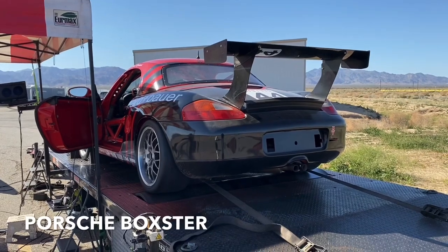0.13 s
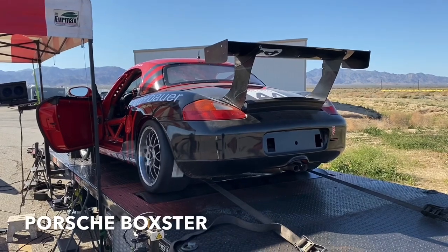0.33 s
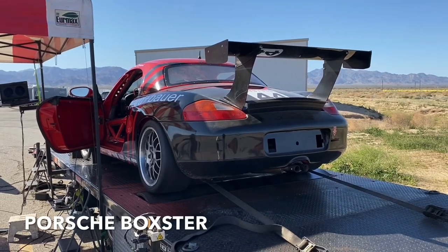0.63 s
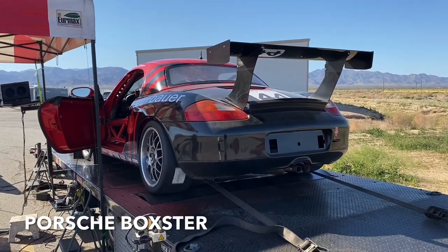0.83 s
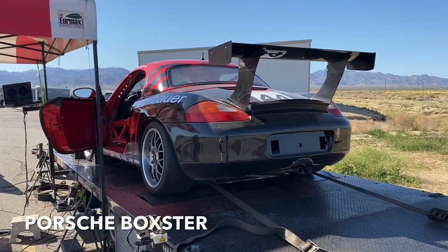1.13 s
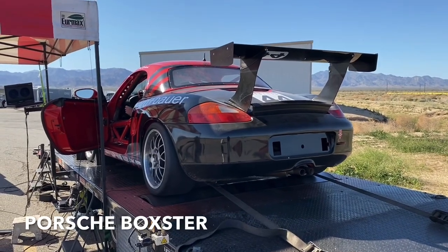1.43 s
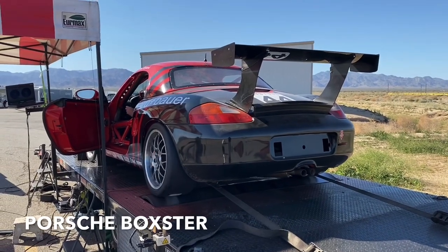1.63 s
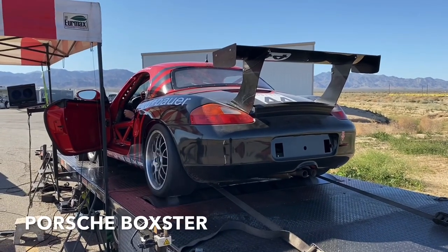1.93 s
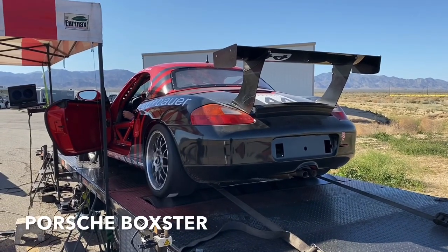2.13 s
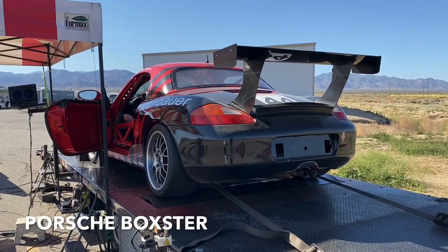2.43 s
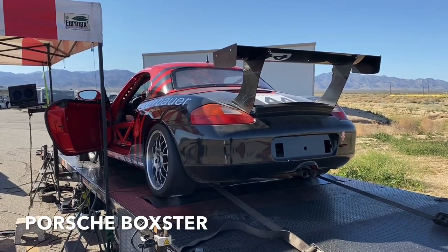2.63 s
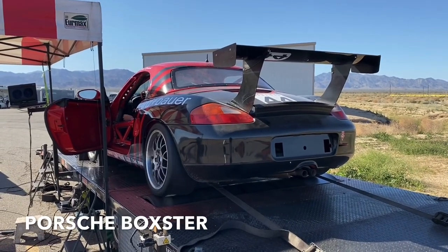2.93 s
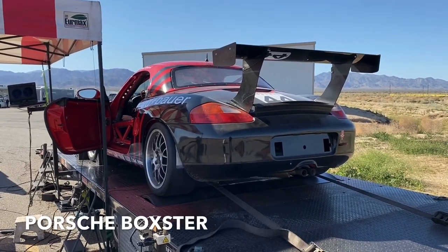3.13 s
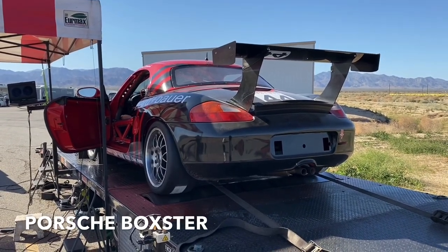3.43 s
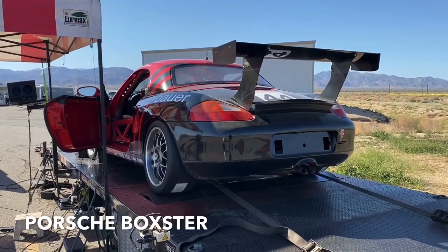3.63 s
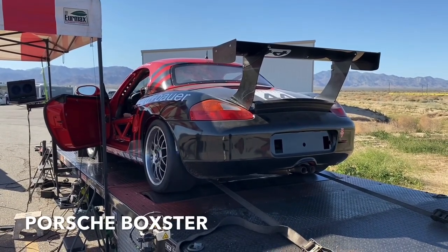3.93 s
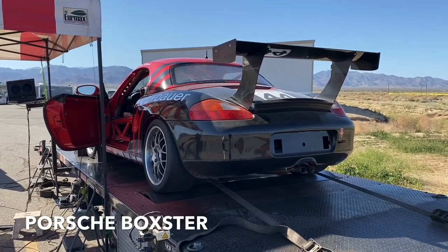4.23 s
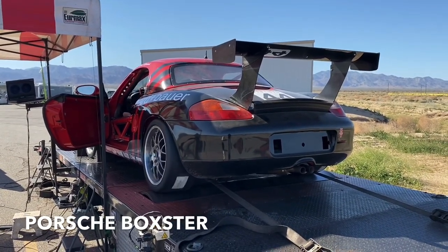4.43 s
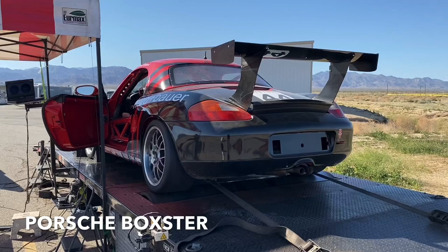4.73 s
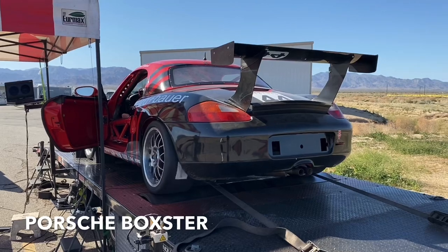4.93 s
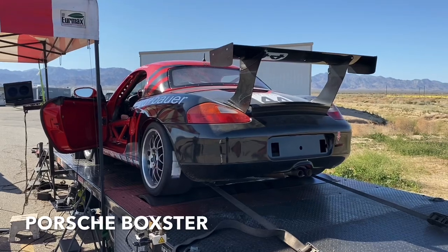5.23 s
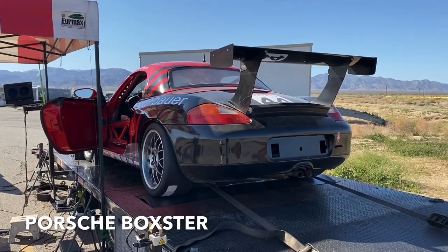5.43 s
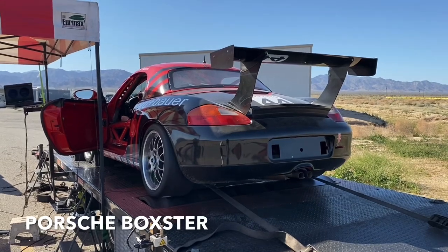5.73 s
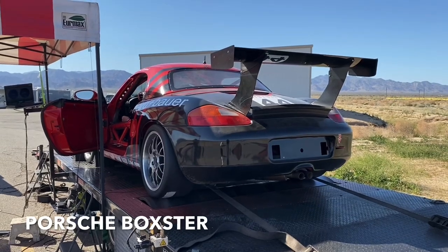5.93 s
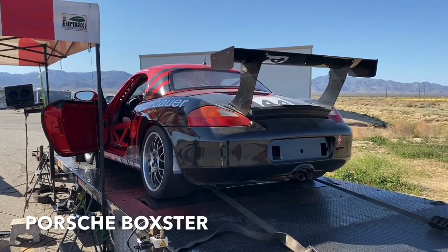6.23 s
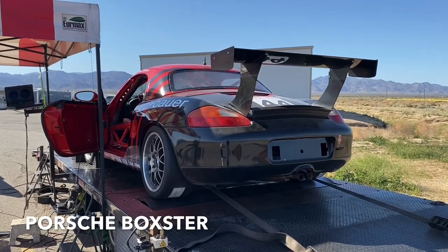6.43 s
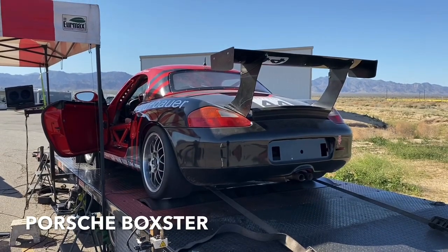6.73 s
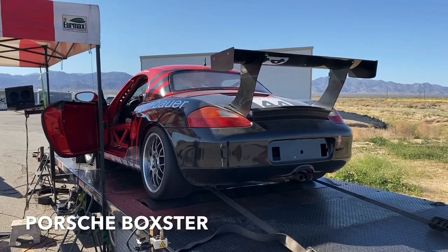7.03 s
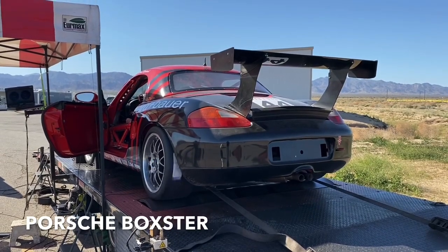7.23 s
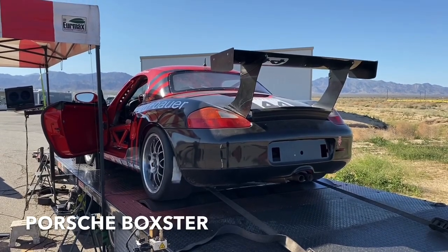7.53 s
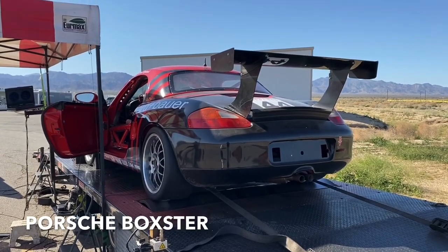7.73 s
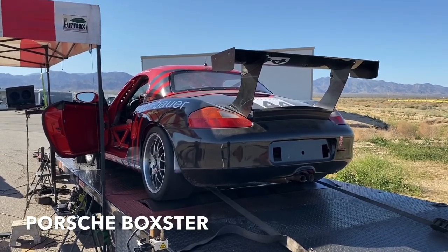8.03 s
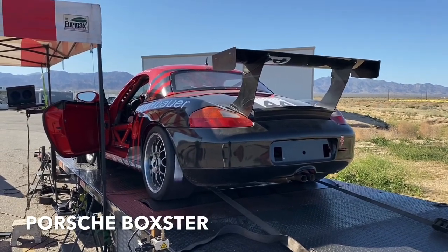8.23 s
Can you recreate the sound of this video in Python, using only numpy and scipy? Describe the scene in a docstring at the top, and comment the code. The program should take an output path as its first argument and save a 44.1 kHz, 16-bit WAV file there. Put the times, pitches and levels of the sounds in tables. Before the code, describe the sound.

A quick rev jumps up in pitch, then falls slowly as tyres whirr and roar on steel rollers. An air valve spits briefly midway through the descent. After a low point the engine kicks in abruptly, lurches, and pulls harder and higher with uneven growl, crackling exhaust and rising tyre whine. Outdoors behind the car, stereo, little reverberation, faint hum and low wind thumps.

```python
"""A six-cylinder race car on an outdoor chassis dynamometer, heard from behind: a blip, a coast down, a full-throttle pull.
The engine sums firing-rate harmonics and slower beats with a throb, bark, crack and hiss at the firings, over a rumble.
The tyres sing on the rollers: tread-rate lines and a thin whine over a coloured noise roar.
Compressed air puffs as a fading noise burst; a sine hum runs throughout and low wind thumps come late, as decaying sines."""
import sys
import numpy as np
from scipy import signal
from scipy.fft import rfft, irfft, next_fast_len
from scipy.io import wavfile
from scipy.ndimage import uniform_filter1d

SR = 44100
rng = np.random.default_rng(int(sys.argv[2]) if len(sys.argv) > 2 else 0)


def generate_wav(sig):
    """Save sig (samples, or channels by samples) to the path in sys.argv[1] as 16-bit PCM at SR."""
    pcm = np.round(np.clip(np.atleast_2d(sig).T, -1, 1) * 32767).astype(np.int16)
    wavfile.write(sys.argv[1], SR, pcm)


N = 369116

# engine speed before the driveline kick: (t/s, firing rate/Hz)
SPEED = [(0, 97.3), (.09, 105.2), (.14, 125.2), (.23, 172.5), (.3, 167.6), (1, 163.9), (2.25, 156),
         (2.4, 153.4), (2.6, 148.8), (3.2, 131.1), (3.6, 118), (3.9, 109.3), (4.2, 100.3), (4.36, 96.4),
         (4.6, 96.8), (4.8, 99.7), (5.1, 106.1), (5.6, 117.6), (6.6, 141.1), (7.2, 155.4), (8.37, 184.6)]
# one row a cylinder in firing order, before scaling: (strength/dB, lateness/share of the firing gap)
CYLINDERS = [(10, 0.041), (-0.5, -0.035), (8, 0.035), (7.5, -0.023), (3.5, 0.051), (3, -0.068)]
OPENS_S, OPENING_S = 4.2, 0.063  # the throttle goes to full load


def gain_of(db):
    """Turns decibels into an amplitude factor."""
    return 10 ** (np.asarray(db) / 20)


def evened(x):
    """Scales x to rms 1."""
    return x / np.sqrt(np.mean(x ** 2) + 1e-20)


def read(points, hz):
    """Reads a table of values against frequency on a logarithmic axis."""
    f, value = np.transpose(points)
    return np.interp(np.log(hz + 1), np.log(f + 1), value)


def curves(rows):
    """Draws each column of a timed table as a line over the whole scene."""
    s, *columns = np.transpose(rows)
    return [np.interp(np.arange(N) / SR, s, c) for c in columns]


def coloured(x, spectrum):
    """Passes x through a causal minimum-phase filter of energy 1 with the given spectrum."""
    log_gain = read(spectrum, abs(np.fft.fftfreq(8192, 1 / SR))) * np.log(10) / 20
    response = np.exp(np.conj(signal.hilbert(log_gain)))
    taps = np.fft.ifft(response).real[:4096]
    return signal.oaconvolve(x, taps / np.linalg.norm(taps))[:N]


def drift(per_s):
    """Slow chance of rms 1: noise smoothed twice over 1 / per_s seconds."""
    span = max(int(SR / per_s), 2)
    smooth = uniform_filter1d(rng.standard_normal(N), span)
    return evened(uniform_filter1d(smooth, span))


def clicks(at, size):
    """Band-limited clicks at exact places between samples, as windowed sincs."""
    index = np.floor(at).astype(int)[:, None] + np.arange(-7, 9)
    off = index - at[:, None]
    out = np.zeros(N + 40000)
    shape = np.sinc(off) * np.cos(np.pi * off / 18) ** 2
    np.add.at(out, np.clip(index, 0, None), size[:, None] * shape)
    return out[:N]


def throttle():
    """0 when shut, 1 when wide open, and the seconds since it began to open."""
    since = np.maximum(np.arange(N) / SR - OPENS_S, 0)
    return np.minimum(since / OPENING_S, 1), since


def blend(shut, wide):
    """Moves from the throttle-shut value to the wide-open one as the throttle opens."""
    return shut + throttle()[0] * (wide - shut)


def firing_rate():
    """Firings per second; the driveline winds up and rings out as the throttle opens."""
    kick_share, kick_lag_s, kick_decay_s, kick_hz = .085, .035, .12, 9
    wound = np.maximum(throttle()[1] - kick_lag_s, 0)
    kick = np.exp(-wound / kick_decay_s) * np.sin(2 * np.pi * kick_hz * wound)
    return curves(SPEED)[0] * (1 + kick_share * kick)


def harmonic_levels(rate, drive_db, bark_db):
    """Level of each firing-rate harmonic: drive, pipe resonances and, under load, a gain from the bark."""
    # one row a harmonic: (throttle shut/dB on the drive, open/dB on the drive, gain/dB per dB of bark)
    harmonics = [(8, 11.5, 0), (3, 5.5, 0), (-9.5, 0.24, 0), (-35, -9.5, 0), (-29, -0.5, 1.8),
                 (-27, -2, 0.5)]
    # what the pipe passes when coasting: (f/Hz, level/dB)
    pipe_shut = [(95, -13.5), (118, 4), (140, 5.5), (165, 1), (200, -1.5), (236, 6), (270, 2.5),
                 (320, -4.5), (400, -10.5), (510, -10)]
    # what the pipe passes under load: (f/Hz, level/dB)
    pipe_open = [(90, -4.5), (110, 0.7), (125, 4), (150, -2.1), (185, 4), (230, 5.3), (285, 9), (320, 4.5),
                 (360, 3.1), (430, 5.5), (470, -1), (510, -11.5), (560, -1.5), (620, -8.5), (700, -7.4),
                 (780, -4), (860, -9), (1000, -25), (1120, -10)]
    usual_bark_db = -31  # the bark at which the harmonics gain nothing
    levels = []
    for k, (shut, wide, per_db) in enumerate(harmonics, 1):
        coasting_db = shut + read(pipe_shut, k * rate)
        loaded_db = wide + read(pipe_open, k * rate) + per_db * (bark_db - usual_bark_db)
        levels.append(drive_db + blend(coasting_db, loaded_db))
    return levels


def clean_tones(turns, harmonic_db):
    """The pipe delays each harmonic differently, which spreads the pulse."""
    return sum(np.sqrt(2) * gain_of(db + .3 * drift(25)) * np.cos(2 * np.pi * k * turns + .9 * k ** 2)
               for k, db in enumerate(harmonic_db, 1))


def lope(rate, turns, drive_db):
    """One cylinder fires weakly: the beats line up against the harmonics once a cycle."""
    # beats between the harmonics, before sway: (f/sixths of the firing rate,
    # coasting slow/dB, coasting fast/dB, loaded slow/dB, loaded fast/dB)
    beats = [(2, -80, -65, -70, -59), (3, -61, -52.5, -55, -48), (4, -67, -48, -72, -62),
             (5, -53, -57, -63, -55), (7, -62, -56.5, -51, -59), (8, -51.5, -57, -39.5, -32.5),
             (9, -53, -58.5, -40.5, -37), (10, -54, -71, -62, -41), (11, -65, -83, -69, -44),
             (13, -60, -72, -68, -51), (14, -65, -62.5, -40, -36), (15, -79, -83, -33, -45),
             (16, -62, -78, -39, -49.5)]
    slow, fast = 100, 170  # firings per s
    full_drive_db, weak_slope = -32.5, 3  # below this drive, loaded beats lose dB per dB
    quickness = (rate - slow) / (fast - slow)
    weak_db = weak_slope * np.minimum(drive_db - full_drive_db, 0)
    sways = [3.0 * drift(2.3) for _ in CYLINDERS]
    out = np.zeros(N)
    for k, shut_slow, shut_fast, open_slow, open_fast in beats:
        coasting_db = shut_slow + quickness * (shut_fast - shut_slow)
        loaded_db = open_slow + quickness * (open_fast - open_slow) + weak_db
        level = gain_of(blend(coasting_db, loaded_db) + sways[round(k) % len(sways)])
        order = k / len(CYLINDERS)
        out -= np.sqrt(2) * level * np.cos(2 * np.pi * order * turns + .9 * order ** 2)
    return out


def roughness(rate):
    """Gas share of the bark, gas share of the crack, and mismatch of the two cylinder banks."""
    # under load: (firing rate/Hz, gas in the bark/0-1, gas in the crack/0-1, bank mismatch/0-1)
    rough_open = [(124, .4, .62, 1), (136, .28, .32, 1), (153, .3, .32, .8), (167, .25, .24, .2),
                  (185, .25, .22, .15)]
    # when coasting: (gas in the bark/0-1, gas in the crack/0-1, bank mismatch/0-1)
    rough_shut = (.8, .95, 1)
    speed, *shares = np.transpose(rough_open)
    return [blend(shut, np.interp(rate, speed, wide)) for shut, wide in zip(rough_shut, shares)]


def uneven_firings(turns, mismatch):
    """Strength and lateness of every firing: a cylinder averaged with its twin, plus their mismatch."""
    count = np.arange(1, int(turns[-1]))
    table = np.array(CYLINDERS)
    own = table[count % len(CYLINDERS)].T
    twin = table[(count + len(CYLINDERS) // 2) % len(CYLINDERS)].T
    return (own + twin + np.interp(count, turns, mismatch) * (own - twin)) / 2


def firings(rate, turns, lateness, size):
    """A click per firing, near rms 1 at any speed because each grows with the root of its gap."""
    count = np.arange(1, int(turns[-1]))
    at = np.interp(count + lateness, turns, np.arange(N))
    return np.sqrt(SR / rate) * clicks(at, size / np.sqrt(np.mean(size ** 2)))


def with_gas(pulses, share, turns):
    """Gas rushes out just after each valve opens: gusting noise takes its share of the energy."""
    gust = 0.41 + np.exp(-(turns % 1) / 0.22)
    gas = evened(gust * rng.standard_normal(N))
    return np.sqrt(1 - share) * pulses + np.sqrt(share) * gas


def throb(rate, turns, strength_db, chance, first_db):
    """What differs between cylinders sounds at sixths of the firing rate."""
    # relative spectrum: (f/Hz, level/dB)
    throb_colour = [(35, -48), (60, -13.5), (110, -18), (240, -5.5), (400, -8), (600, -3), (900, -50.5)]
    # below the first harmonic: (throttle shut/dB, open/dB)
    uneven_db = (-21, -19.5)
    surplus = gain_of(strength_db + .45 * chance)
    pulses = firings(rate, turns, 0, surplus - surplus.mean())
    return coloured(pulses, throb_colour) * gain_of(first_db + blend(*uneven_db))


def bark(rate, turns, strength_db, late, chance, jitter, gas_share, level_db):
    """Uneven firing pulses and rushing gas, coloured as the bark of the pipe."""
    # relative spectrum: (f/Hz, level/dB)
    bark_colour = [(250, -65.5), (420, 0.5), (560, 1), (720, 11), (880, 9), (1020, -6.5), (1300, -33.5)]
    pulses = firings(rate, turns, .5 * late + jitter, gain_of(.9 * strength_db + .8 * chance))
    return coloured(with_gas(pulses, gas_share, turns), bark_colour) * gain_of(level_db)


def crack(rate, turns, strength_db, late, chance, jitter, gas_share, level_db):
    """Sharp pulse fronts and gas at the tailpipe; each pulse echoes once in the pipe."""
    # relative spectrum: (f/Hz, level/dB)
    crack_colour = [(590, -7.5), (1000, -7), (1050, -1.5), (1230, 6), (1600, 6), (1840, 0.5), (2370, 2),
                    (2660, -11), (3640, -7.5), (5390, -22.5), (6500, -29), (8450, -70), (14300, -120)]
    # the pipe dulls each pulse front: (f/Hz, relative level/dB)
    blunt = [(100, 0), (1650, 0), (2000, -6), (2500, -8), (3200, -16), (16000, -22)]
    pulses = firings(rate, turns, late + jitter, gain_of(1.2 * strength_db + .9 * chance))
    pulses = .85 * pulses + .5 * np.roll(pulses, round(.0029 * SR))  # the pipe echo, 2.9 ms later
    pulses = .39 * coloured(pulses, blunt)  # keeps the low part of the pulse at its level
    return coloured(with_gas(pulses, gas_share, turns), crack_colour) * gain_of(level_db)


def hiss(rate, turns, late, chance, crack_db):
    """A puff of gas at every firing: each click decays over about a millisecond and swells steady noise."""
    # relative spectrum: (f/Hz, level/dB)
    hiss_colour = [(3500, -35), (5500, -18), (7000, -10), (8500, -3.5), (10500, 1), (12000, -9),
                   (14000, -2), (15800, -12)]
    # how the hiss follows the crack, throttle shut then open: (slope/dB per dB, offset/dB)
    hiss_law = [(.3, -50), (1.05, -15)]
    level_db = blend(*(slope * crack_db + offset for slope, offset in hiss_law))
    pulses = abs(firings(rate, turns, late, gain_of(3.4 * chance)))
    puffs = signal.lfilter([1], [1, -np.exp(-1 / (0.0011 * SR))], pulses)
    noise = evened((0.71 + evened(puffs)) * rng.standard_normal(N))
    return coloured(noise, hiss_colour) * gain_of(level_db)


def rumble():
    """Unsteady low noise under the engine."""
    # relative spectrum: (f/Hz, level/dB)
    rumble_colour = [(15, -12), (32, -24), (55, -18), (90, -12), (200, -12), (400, -16.5), (600, -44)]
    # before the unsteadiness: (t/s, level/dB)
    rumble_level = [(0, -62), (.5, -56), (2.2, -50.5), (3.6, -50.5), (4.3, -55), (4.6, -38), (5.4, -37),
                    (6.3, -44), (6.8, -37), (7.4, -49), (8.37, -44)]
    level_db = curves(rumble_level)[0] + 3.1 * drift(5.0)
    return coloured(rng.standard_normal(N), rumble_colour) * gain_of(level_db)


def engine():
    """Clean low harmonics, uneven cylinders, and a bark, crack and puff of gas at every firing."""
    # the engine's mix: (t/s, drive of the clean harmonics/dB, pipe bark/dB, tailpipe crack/dB)
    engine_levels = [(0, -46.5, -56, -65), (.14, -52, -58, -68), (.18, -55, -54, -59), (.23, -42, -53, -48),
                     (.3, -46.5, -55.5, -53), (1, -47, -54.5, -53), (1.7, -49, -50.5, -53.5),
                     (2.4, -51.5, -52.5, -56), (3.2, -49.5, -56, -73), (4.2, -43.5, -56, -62),
                     (4.28, -40, -35.5, -42), (4.36, -37.5, -40.5, -39.5), (4.5, -34, -34.5, -34),
                     (5, -32.5, -30.5, -28.5), (5.6, -29.5, -33.5, -24.5), (6.2, -29, -31.5, -24),
                     (6.42, -28, -26, -21), (6.65, -27.8, -25, -17), (6.7, -29.5, -26.5, -18.5),
                     (7, -27, -27.5, -19.5), (7.4, -30, -35.5, -22.5), (7.7, -30, -32.5, -20.5),
                     (8.37, -30.5, -29, -20.5)]
    rate = firing_rate()
    turns = np.cumsum(rate) / SR  # firings so far
    drive_db, bark_db, crack_db = curves(engine_levels)
    harmonic_db = harmonic_levels(rate, drive_db, bark_db)
    bark_gas, crack_gas, mismatch = roughness(rate)
    strength_db, late = uneven_firings(turns, mismatch)
    # throb and bark share their strength chance, bark and crack their timing chance
    body, timing, snap, puff = rng.standard_normal((4, len(late)))
    jitter = .003 * timing
    return (clean_tones(turns, harmonic_db) + lope(rate, turns, drive_db)
            + throb(rate, turns, strength_db, body, harmonic_db[0])
            + bark(rate, turns, strength_db, late, body, jitter, bark_gas, bark_db)
            + crack(rate, turns, strength_db, late, snap, jitter, crack_gas, crack_db)
            + hiss(rate, turns, late, puff, crack_db) + rumble())


def tread_rate():
    """Tread pattern repeats per second: rolling free, then tied to the engine, slipping as rollers brake."""
    tread_per_firing, clutch_s = .5005, .3  # the clutch is in from this time
    free_tread, free_slowing = 86.4, 8  # before that: repeats per s, lost per s
    slip, brakes_s, braking_s = .008, 2.3, .4  # share of tread speed lost, from when, how soon
    t = np.arange(N) / SR
    rate = np.where(t < clutch_s, free_tread - free_slowing * t, tread_per_firing * curves(SPEED)[0])
    braking = np.clip((t - brakes_s) / braking_s, 0, 1)
    return rate * (1 - slip * braking * (1 - throttle()[0]))


def singing(rate):
    """The tread sings on multiples of its repeat rate, each line swelling a little."""
    # lines before swells and carry: (f/multiple of the repeat rate, relative level/dB)
    tread_lines = [(9, -1.5), (10, -5), (18, -6), (19, -3.5), (27, -4.5), (28, -0.5), (33, -6), (34, -4),
                   (36, -1.5), (37, 1.5), (41, -22), (43, 2.5), (45, -1), (46, 2), (47, -5), (52, -3.5),
                   (54, -2), (55, -2), (58, -11), (61, -16), (62, -7), (64, -15), (67, -20)]
    # how the singing carries: (f/Hz, relative level/dB)
    carry = [(400, 2), (1500, 6), (1850, 1), (2200, 9.5), (2550, 1), (2950, 7), (3300, -2), (3700, 3),
             (4300, -6), (5000, -9), (6000, -35)]
    turns = np.cumsum(rate * (1 + 0.000918 * drift(29.0))) / SR
    swells = [2.5 * drift(3) for _ in range(4)]
    out = np.zeros(N)
    for k, (multiple, db) in enumerate(tread_lines):
        level = gain_of(db + swells[k % len(swells)] + read(carry, multiple * rate))
        out += level * np.cos(2 * np.pi * (multiple * turns + rng.random()))
    return evened(out)


def tread_whine(rate):
    """A thin whine, unsteady in pitch and level, high above the tread rate."""
    # against the rolling roar, before flutter: (f/Hz, level/dB)
    whine_level = [(4000, -15), (5300, -17), (6200, -21.5), (7500, -23)]
    hz = 85 * rate
    tone = np.cos(2 * np.pi * np.cumsum(hz * (1 + .009 * drift(300))) / SR)
    return gain_of(read(whine_level, hz) + 2.2 * drift(12)) * tone


def rolling_roar():
    """Coloured noise of the rolling tyres, with a quick flutter in level."""
    # relative spectrum: (f/Hz, level/dB)
    roar_colour = [(200, -21), (400, 3.5), (800, -1.5), (1050, 5), (1500, 4), (1950, 1), (2500, 2),
                   (3300, 4.5), (4300, -6), (5300, -16), (7000, -15), (10500, -18.5), (15800, -50)]
    return coloured(rng.standard_normal(N) * gain_of(1.4 * drift(90)), roar_colour)


def tyres():
    """The tyres on the rollers: singing lines, and a whine that follows the level of the roar."""
    # the tyre mix: (t/s, singing/dB, rolling roar/dB)
    tyre_level = [(0, -47, -48), (1.7, -44.5, -46.5), (2.3, -45, -44.5), (2.7, -46, -46.5),
                  (3.3, -48.5, -47.5), (4.2, -52.5, -51), (4.5, -46, -43.5), (8.37, -36, -38)]
    rate = tread_rate()
    singing_db, roar_db = curves(tyre_level)
    return singing(rate) * gain_of(singing_db) + (rolling_roar() + tread_whine(rate)) * gain_of(roar_db)


def hum():
    """A steady-pitched low hum nearby, wavering slightly in level."""
    # before the waver: (f/Hz, level/dB)
    hum_tones = [(53.8, -58)]
    t = np.arange(N) / SR
    return sum(np.sqrt(2) * gain_of(db + 0.88 * drift(8.6)) * np.sin(2 * np.pi * hz * t)
               for hz, db in hum_tones)


def air_puff():
    """A valve lets off compressed air: the pressure sinks, then the valve closes."""
    # relative spectrum: (f/Hz, level/dB)
    air_colour = [(2000, -25), (3500, -10.5), (6000, -8), (8000, -7), (10500, -1), (12000, -8), (15800, -6)]
    start_s, start_db, rise_s = 2.118, -32.5, 0.0071
    fade_db_per_s, shuts_s, shut_db_per_s = 32, 2.38, 168  # the closing adds to the fade
    t = np.arange(N) / SR
    closing_db = shut_db_per_s * np.maximum(t - shuts_s, 0)
    level_db = start_db - fade_db_per_s * (t - start_s) - closing_db
    level = np.clip((t - start_s) / rise_s, 0, 1) * gain_of(level_db + 1.23 * drift(62))
    return coloured(rng.standard_normal(N), air_colour) * level


def wind_thumps():
    """Low wind thumps at the microphone: short sines that swell and die away."""
    # one row a thump: (t/s, approximate envelope peak/dB, f/Hz)
    thumps = [(5.359, -36, 60), (6.619, -33, 60), (8.329, -47, 61)]
    t = np.arange(N) / SR
    out = np.zeros(N)
    for s, db, hz in thumps:
        u = np.maximum(t - s, 0)
        envelope = np.e * u / .014 * np.exp(-u / 0.015)
        out += gain_of(db) * envelope * np.sin(2 * np.pi * hz * u)
    return out


def ports(x):
    """Direct sound reaches two ports with a phase lead; scatter from ground and car has opposite signs."""
    # how far the left port leads: (f/Hz, phase/rad)
    lead = [(0, 0), (300, 0), (900, -.45), (2600, -.5), (3500, -.2), (6200, 0), (8300, -3.1),
            (15800, -15.8)]
    # direct sound, left minus right: (f/Hz, level/dB)
    louder = [(60, -0.73), (150, -0.088), (380, -2.2), (950, 1.0), (2380, 1.0), (5980, 1), (15000, -1)]
    # scattered against direct sound: (f/Hz, level/dB)
    scattered = [(20, -8), (45, -12), (75, -26), (200, -24), (400, -17), (1000, -13), (3000, -8),
                 (5500, -1), (8000, -8), (15800, -8)]
    size = next_fast_len(N + SR)
    hz, t = np.fft.rfftfreq(size, 1 / SR), np.arange(SR // 2) / SR
    tail = rng.standard_normal(len(t)) * gain_of(-60 * t / .3)  # falls 60 dB in 0.3 s
    scatter = rfft(tail, size)
    scatter *= gain_of(read(scattered, hz)) / np.sqrt(np.mean(abs(scatter) ** 2))
    # half the difference goes to each side
    half = np.exp(.5j * np.interp(hz, *np.transpose(lead))) * gain_of(read(louder, hz) / 2)
    left_right = np.array([(1 + scatter) * half, (1 - scatter) / half])
    return irfft(rfft(x, size) * left_right, size)[:, :N]


def scene():
    """Engine, tyres, hum, air puff and wind thumps, heard at the two microphone ports."""
    return ports(engine() + tyres() + hum() + air_puff() + wind_thumps())


def record(dry):
    """The microphone drops the deepest bass; then the band limit takes off the top."""
    edge_hz = 15800
    dry = signal.sosfilt(signal.butter(2, 38, "high", fs=SR, output="sos"), dry)
    band_limit = signal.firwin(1023, edge_hz, window=("kaiser", 9), fs=SR)
    return signal.oaconvolve(dry, band_limit[None], "same")


dry = scene()
out = record(dry)
generate_wav(out)
```